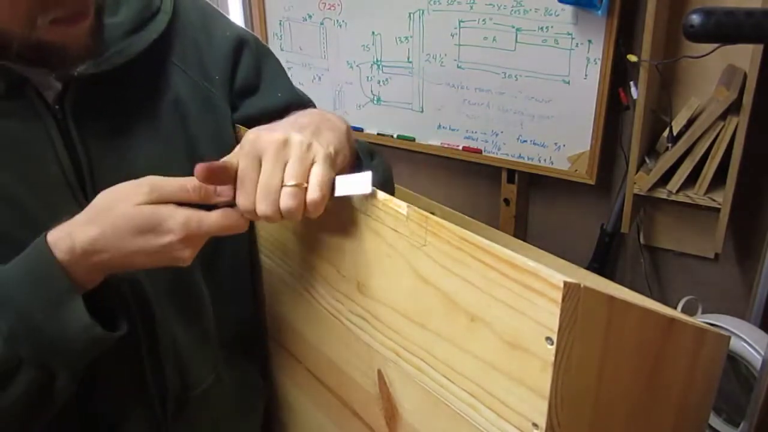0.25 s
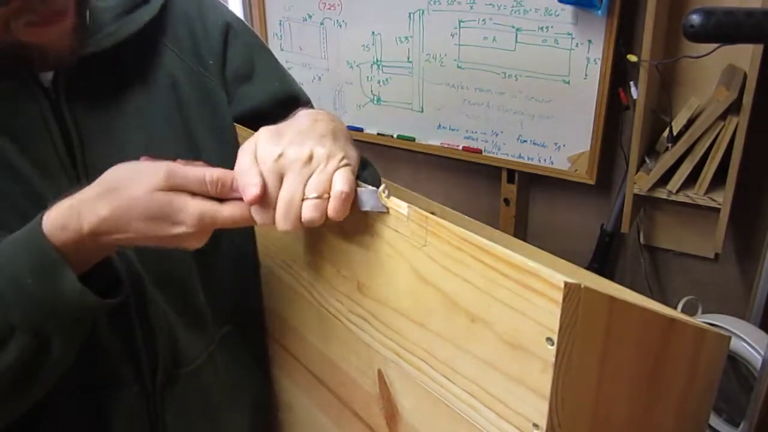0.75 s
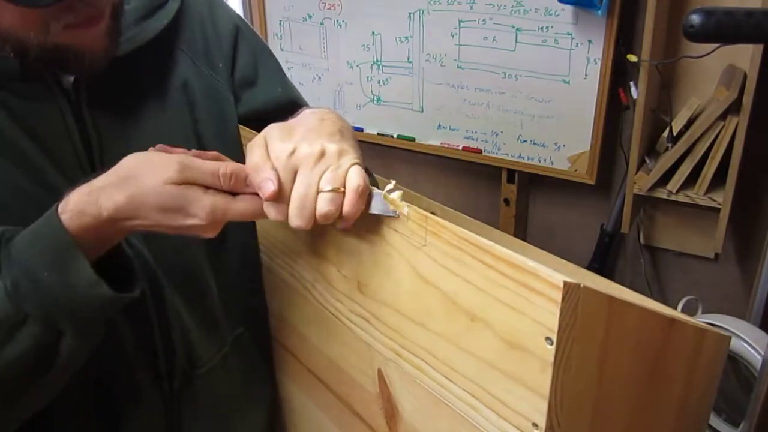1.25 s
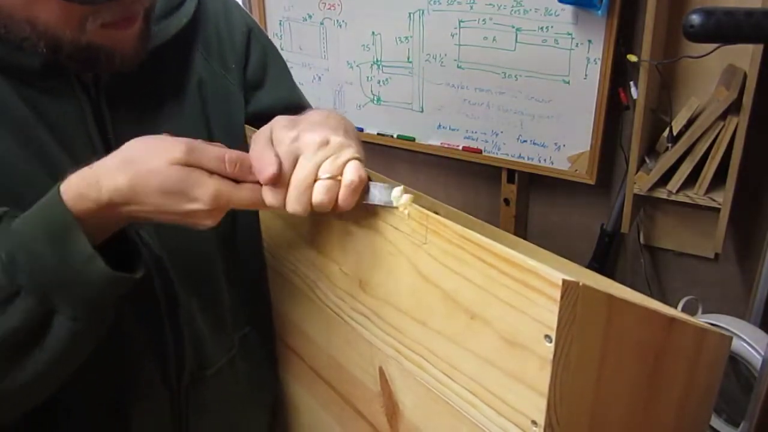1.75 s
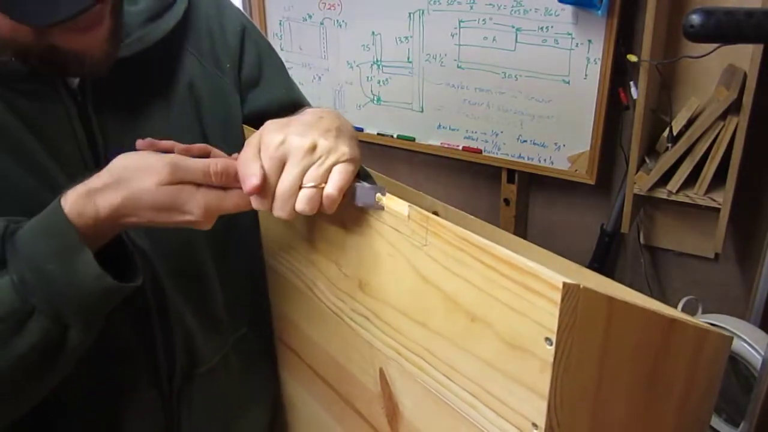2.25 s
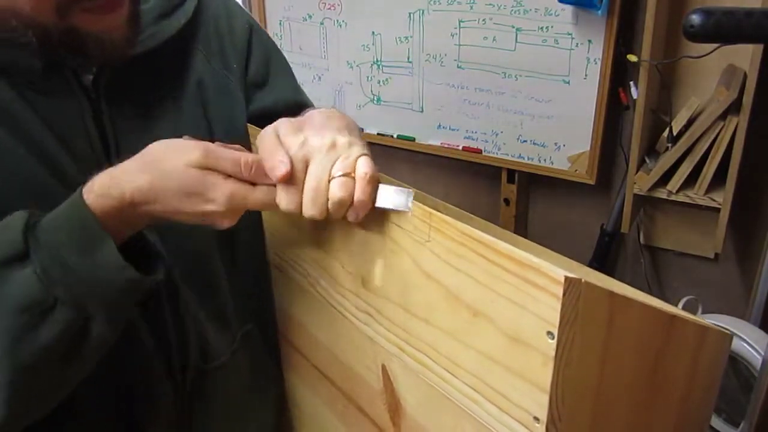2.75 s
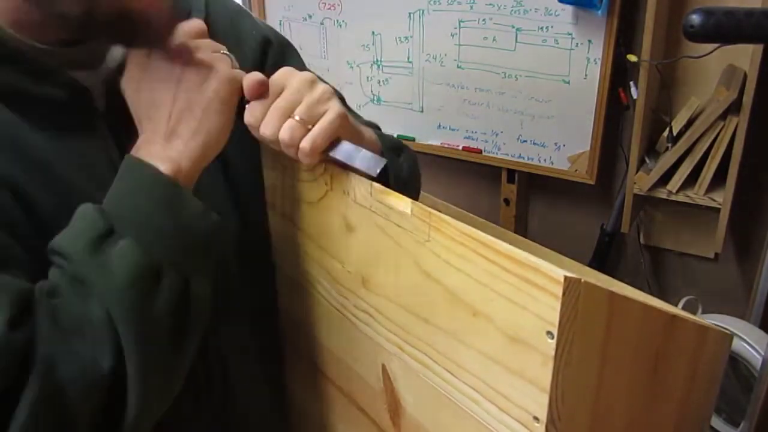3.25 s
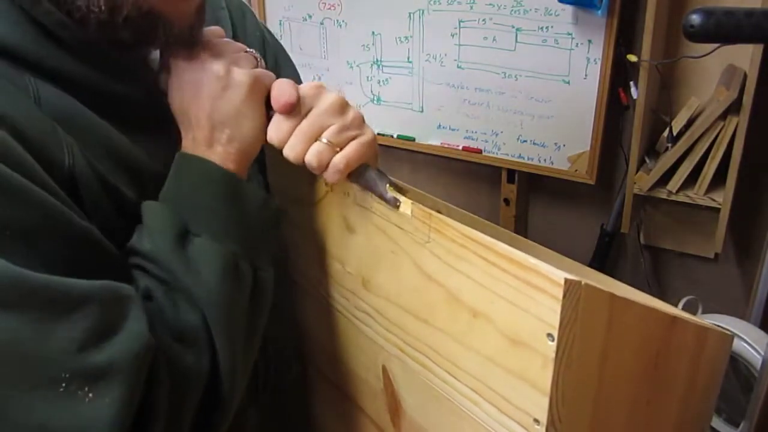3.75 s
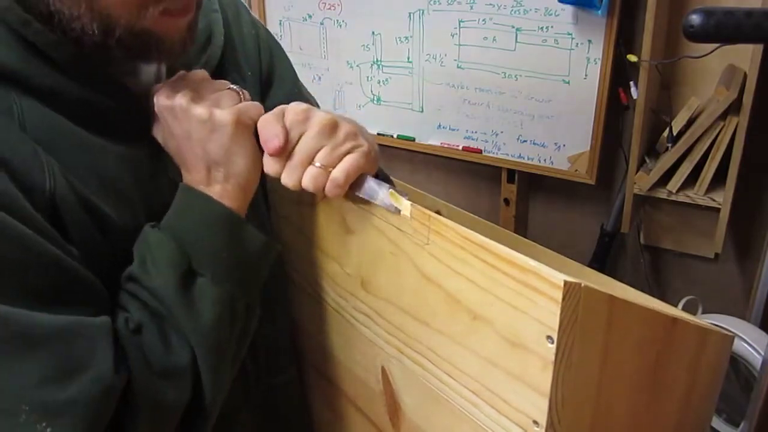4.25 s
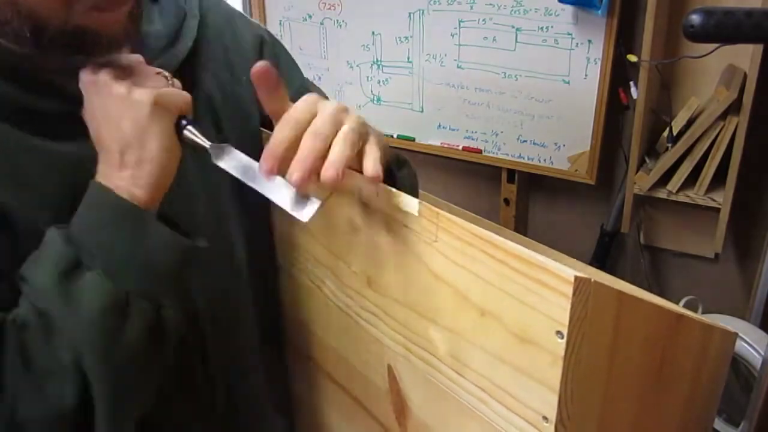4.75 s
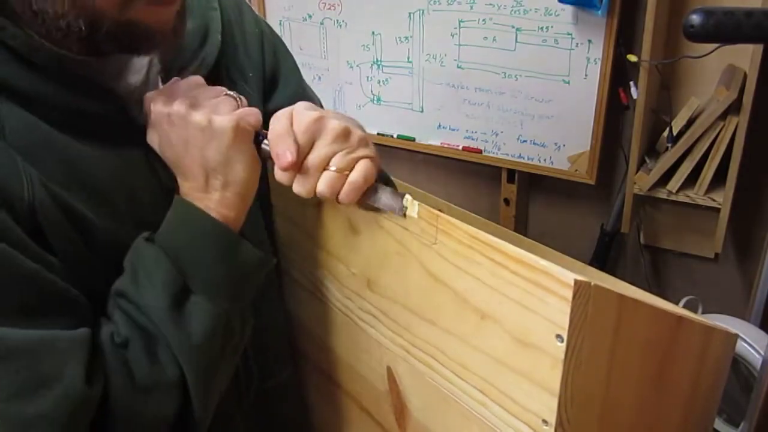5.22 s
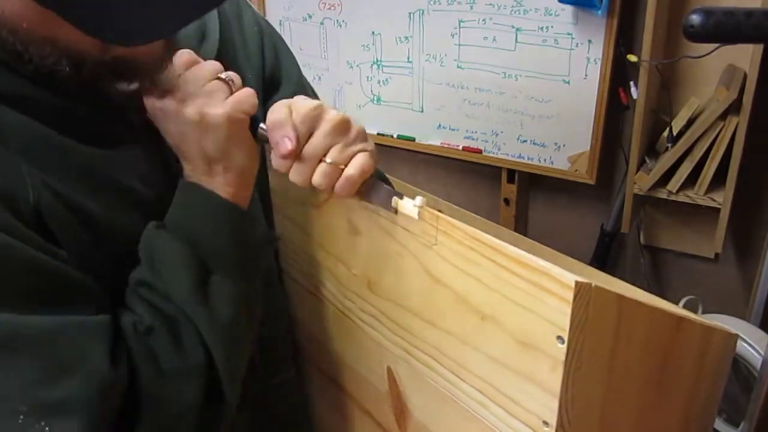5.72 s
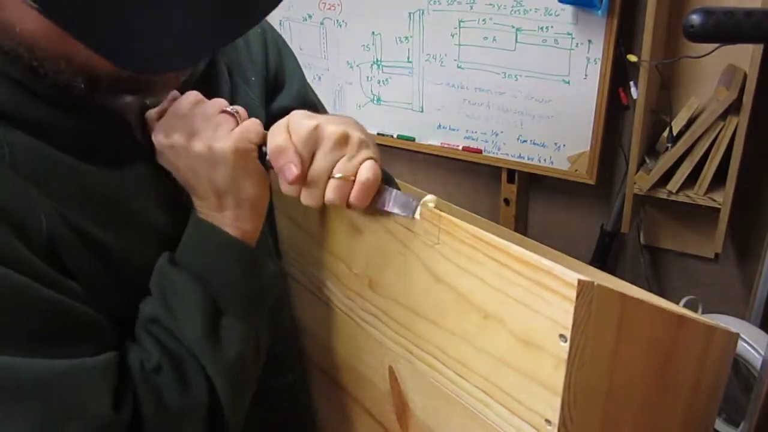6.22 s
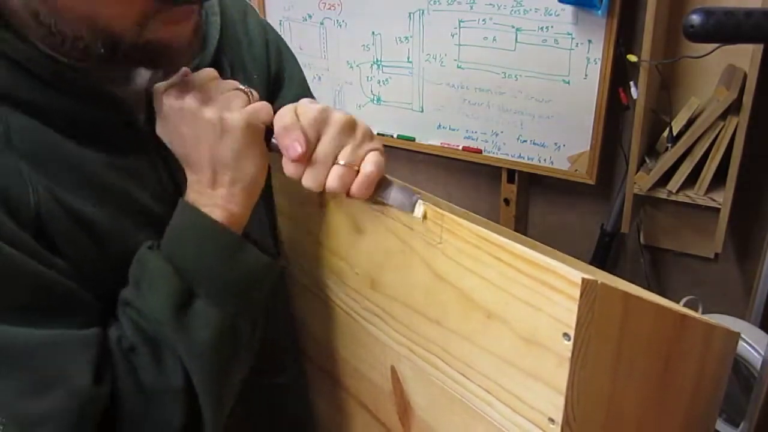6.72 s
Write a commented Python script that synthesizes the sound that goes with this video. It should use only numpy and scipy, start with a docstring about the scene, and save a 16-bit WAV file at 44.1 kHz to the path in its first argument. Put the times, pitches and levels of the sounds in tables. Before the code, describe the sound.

A close microphone in a small, dry workshop catches hand chiselling on a pine box. For the first 0.4 seconds there is only soft room air with a faint low hum. From 0.5 the blade bites: quick, irregular ticks and crackles, with sharper snaps near 0.57, 1.14, 1.6, 1.73, 2.17 and 2.3, short woody ringing and a faint scrape under each push. Cutting thins after 2.75. Around 2.9 to 3.1 fingers brush shavings away, a soft fading hiss and a shorter one. Small ticks resume near 3.45, then isolated hard clicks at 3.88, 4.33 and the loudest at 4.6. A quieter patch follows, with light crackles and moderate snaps around 5.1, 5.33, 5.7, 6.18 and 6.5, a strong click at 6.68 and a last small crunch near 6.94. A very faint distant motor whine wavers from about 4 seconds onward.

```python
"""A quiet workshop, close to a single microphone: a chisel pares the edge of a pine box.
Each push tears a few fibres: short noise bursts excite the damped modes of boards and blade.
Under each push the edge rubs softly, louder as the tears grow louder, as slip noise through the
same modes; fingers twice brush shavings away as shaped hiss. Behind lie room air, as coloured noise
with fuzzy drones, and a far motor's whine, as drifting sines. Sparse decaying taps echo the tears."""
import sys
import numpy as np
from scipy import signal
from scipy.fft import rfft, irfft
from scipy.io import wavfile
from scipy.ndimage import uniform_filter1d

SR = 44100
rng = np.random.default_rng(int(sys.argv[2]) if len(sys.argv) > 2 else 0)


def put_to_file(sound):
    """Save the sound as 16-bit audio at rate SR, in the file named by the first command-line argument."""
    columns = np.atleast_2d(sound).T  # one column per channel
    safe = np.clip(columns, -1, 1)
    whole_steps = np.round(safe * 32767)
    wavfile.write(sys.argv[1], SR, whole_steps.astype(np.int16))


N = 307818

# the four bands of a tear, in order thump, ring, crack, fizz: low f/Hz, high f/Hz
TEAR_BANDS = [(240, 1250), (1250, 2300), (2300, 6800), (6800, 19000)]


def gain_of(db):
    """Logarithmic level: decibels to an amplitude ratio."""
    return 10 ** (np.asarray(db) / 20)


def evened(x):
    """Power normalisation: scales a signal to rms 1."""
    return x / np.sqrt(np.mean(x ** 2) + 1e-20)


def read(points, hz):
    """Interpolation of a spectrum table on a logarithmic frequency axis."""
    f, value = np.transpose(points)
    return np.interp(np.log(hz + 1), np.log(f + 1), value)


def follow(rows, column):
    """Linear interpolation in time: one column of a curve at every sample."""
    rows = np.array(rows)
    return np.interp(np.arange(N) / SR, rows[:, 0], rows[:, column])


def patchy_noise(colour_db, patchy_db, size):
    """Filtered Gaussian noise: random short-time spectra of a given colour, in loud and soft patches."""
    frames = 4 * N // size + 5
    real, imaginary, patches = rng.standard_normal((frames, size // 2 + 1, 3)).T
    patches = uniform_filter1d(patches, size=10, axis=0)
    patches = evened(uniform_filter1d(patches, size=10, axis=1))
    level_db = colour_db[:, None] + patchy_db * patches
    spectra = (real + 1j * imaginary) * gain_of(level_db)
    noise = signal.istft(spectra, nperseg=size, noverlap=3 * size // 4)[1]
    return evened(noise[:N])


def air():
    """Broadband room noise: a continuous spectrum on which resonance-shaped peaks stand as drones."""
    # colour of the air: f/Hz, relative spectral level/dB
    air_colour = [(18, -60), (30, -18.5), (153, -6.5), (227, -5), (415, -1), (801, -4.5), (1460, -9.5),
                  (1960, -7), (2680, -12), (5000, -16), (8000, -18.5), (13700, -22.5), (15800, -26)]
    # drones in the air: f/Hz, width/Hz, level over the air/dB
    drones = [(400, 90, 3.5), (965, 25, 8), (2890, 30, 4)]
    # overall level of the air: t/s, level/dB
    air_level = [(0, -62.5), (.4, -62.5), (.7, -60.5), (1.3, -58.5), (3.5, -58), (4.8, -59.5), (6.98, -59)]
    hz = np.fft.rfftfreq(2048, 1 / SR)
    drones_db = sum(db / (1 + (2 * (hz - f) / width) ** 2) for f, width, db in drones)
    noise = patchy_noise(read(air_colour, hz) + drones_db, patchy_db=2.0, size=2048)
    return gain_of(follow(air_level, 1)) * noise


def motor():
    """Rotating source: tones at fixed multiples of one drifting pitch, each swelling and fading alone."""
    # pitch of the whine: t/s, f/Hz
    whine = [(0, 1287), (3.5, 1280), (3.9, 1240), (4.6, 1265), (5.45, 1305), (6.05, 1299), (6.98, 1262)]
    # swells: multiple of the pitch, t of the top/s, half length down to -10 dB/s, level at the top/dB
    swells = [(1, 4.18, .35, -71), (1, 5.55, .25, -73), (1, 6.35, .55, -68), (3, 5.45, .3, -75),
              (3, 6.05, .5, -71.5), (3, 6.75, .15, -75), (3.5, 6.05, .15, -75)]
    t = np.arange(N) / SR
    turns = np.cumsum(follow(whine, 1)) / SR
    out = np.zeros(N)
    for multiple, top_s, half_s, top_db in swells:
        flutter = evened(uniform_filter1d(rng.standard_normal(N), size=3000))
        level_db = top_db - 10 * ((t - top_s) / half_s) ** 2 + 3 * flutter
        out += gain_of(level_db) * np.sin(2 * np.pi * multiple * turns)
    return np.sqrt(2) * out  # levels are rms


def walls(x):
    """Reverberation: sparse reflections of random sign, each band decaying exponentially at its own rate."""
    # decay of the echo: f/Hz, time for a 60 dB fall t/s
    decay = [(250, 0.054), (700, 0.087), (1800, 0.032), (5000, 0.044), (12000, 0.018)]
    taps, at = np.zeros(8192), np.arange(100, 8000, 20)
    at = at + rng.integers(0, 20, len(at))
    taps[at] = rng.choice([-1., 1.], len(at))
    hz, t, spectra = signal.stft(taps, SR, nperseg=128)
    fall_db = -60 * t / read(decay, hz)[:, None]
    tail = signal.istft(spectra * gain_of(fall_db), SR, nperseg=128)[1]
    return signal.oaconvolve(x, tail / np.linalg.norm(tail))[:N]


def brush():
    """Friction noise of skin on planed wood: a soft hiss, its amplitude modulated by a slight grit."""
    # colour of the hiss: f/Hz, relative spectral level/dB
    hiss_colour = [(1200, -12), (2330, -8), (2440, 6), (2550, -8), (9000, -12), (12000, -6), (13200, -12),
                   (14400, -6), (15800, -10)]
    # fingers sweeping the shavings away: start t/s, length/s, starting level/dB
    strokes = [(2.878, .16, -54.5), (3.05, 0.074, -58)]
    edge_s, fade_db_per_s = 0.016, -44
    grit = gain_of(2.7 * evened(uniform_filter1d(rng.standard_normal(N), size=120)))
    hiss = patchy_noise(read(hiss_colour, np.fft.rfftfreq(1024, 1 / SR)), patchy_db=2, size=1024)
    t = np.arange(N) / SR
    envelope = np.zeros(N)
    for start, length, db in strokes:
        nearest_end_s = np.minimum(t - start, start + length - t)
        ramps = np.clip(nearest_end_s / edge_s, 0, 1)
        envelope += gain_of(db + fade_db_per_s * (t - start)) * ramps
    return envelope * evened(grit * hiss)


def response(low_hz, high_hz):
    """Modal impulse response: damped sines of box and blade plus a plain snap, cut to one band."""
    # modes of box and blade (the pair near 1700 Hz is coupled: it swells, then cancels):
    # f/Hz, width/Hz, level/dB
    modes = [(404, 40, -5.5), (477, 43, -12.5), (619, 40, -13.5), (699, 137, -16), (1071, 48, -8),
             (1645, 115, -1), (1765, 115, -2), (1910, 37, -11.5), (2350, 250, -22), (2540, 1050, -7.5),
             (3650, 460, -1), (3977, 610, 0), (4585, 1500, -9.5), (5240, 32, -13), (5480, 230, -7.5),
             (6769, 560, -5), (7350, 790, -13.5), (8553, 250, -13.5), (8600, 110, -16.5),
             (10680, 140, -29.5), (12400, 180, -40), (13330, 160, -44.5)]
    # snap between the modes: f/Hz, level/dB
    snap = [(550, -17.5), (1700, -15), (3950, -17.5), (11400, -22.5)]
    n = np.arange(2048)
    out = gain_of(read(snap, np.sqrt(low_hz * high_hz))) * (n == 0)
    for k, (hz, width, db) in enumerate(modes):
        if low_hz <= hz < high_hz:
            r = np.exp(-np.pi * width / SR)  # decay per sample
            gain = (-1) ** k * gain_of(db) * 2 * (1 - r)
            out += gain * r ** n * np.sin(2 * np.pi * hz * n / SR)
    band = signal.butter(2, [low_hz, high_hz], "bandpass", fs=SR, output="sos")
    return signal.sosfilt(band, out)


def rub(work):
    """Stick-slip friction: tiny slips excite the modes; they follow the push that also drives the tears."""
    level_db, swing_share = -76.5, 1  # level when tears average -45 dB; share of their swing in dB
    push_s = 0.24  # span of a push
    band_db = (0, -5.5, -7)  # ring, crack, fizz
    unevenness = evened(uniform_filter1d(rng.standard_normal(N), size=200))
    slips = rng.standard_normal(N) * gain_of(7 * unevenness)
    window = np.hanning(round(2 * push_s * SR))
    power = abs(signal.oaconvolve(work ** 2, window / window.sum(), "same"))
    push_db = 10 * np.log10(power + 1e-7) + 45
    sound = 0
    for band, db in zip(TEAR_BANDS[1:], band_db):
        sound = sound + gain_of(db) * evened(signal.oaconvolve(slips, response(*band))[:N])
    return gain_of(level_db + swing_share * push_db) * sound


def faint_tears():
    """Random point process: weak tears at uniform moments, levels scattered about one faint tear."""
    # spans while the blade works: from t/s, to t/s, number of tears
    spans = [(.35, 2.8, 8), (3.4, 6.95, 12)]
    # one faint tear: crack level/dB, then thump, ring and fizz re crack/dB, then swell time
    # (below the 1 ms floor in tears(), so the floor is used)
    typical = (-61.5, -3, 1, -6.5, -1)
    spread_db = 2.5
    s = np.concatenate([rng.uniform(start, end, count) for start, end, count in spans])
    scatter_db = spread_db * rng.standard_normal((len(s), 4))
    return np.c_[s, typical[:4] + scatter_db, np.full(len(s), typical[4])]


def tears():
    """Impulsive excitation: quick swells of uneven fibre snaps convolved with the modes of the work."""
    # fibres tearing: t of the peak/s, crack level as rms over 10 ms/dB, thump re crack/dB,
    # ring re crack/dB, fizz re crack/dB, swell time for 60 dB/s
    tear_rows = [(.468, -64.5, -15, 10.5, -19, 0.0074), (.524, -65, 4, 9, -8, .02),
                 (.5447, -50, -2, -2, -6, 0.03), (.5615, -51, 9, 0, -1, 0.0041),
                 (.5732, -33.5, -10, -6.5, -6, 0.015), (.6043, -49, 8, 8.5, -1.5, 0.026),
                 (.642, -63.5, -2, 3, -3, 0.0086), (.6788, -55.5, 3.5, 5, -0.5, 0.066),
                 (.6979, -49.5, 0.5, 1, -26, 0.014), (.8322, -46, -1, 9, 0, 0.027),
                 (.87, -45, -8.5, -2, -5, 0.0054), (.8953, -52.5, -4, 4, -3.5, 0.042),
                 (.9718, -44.5, 6, 8, -1, 0.012), (1.0442, -46.5, -8, 11.5, 3.5, 0.0037),
                 (1.105, -62, 0, 3, -6, .04), (1.1419, -33, -10.5, 7.5, -3.5, 0.014),
                 (1.1613, -48.5, 0, -8, -31, 0.0099), (1.187, -46.5, -4, -1, -1.5, 0.021),
                 (1.2277, -44.5, -23, -4, -6, 0.0047), (1.2414, -49, -4, 3, -5, 0.017),
                 (1.279, -49, -3, -5, -1.5, 0.018), (1.3177, -48.5, 7.5, 12.5, 3, 0.0094),
                 (1.3784, -57.5, -6, -3, 2.5, 0.018), (1.4423, -55.5, -9, -2, -1.5, .028),
                 (1.473, -38.5, -16.5, 8.5, 3.5, 0.0045), (1.4953, -60, -15, 14, -8, .03),
                 (1.5519, -43, 5, -2, -5, 0.0067), (1.5735, -39.5, 5, 7.5, -2.5, 0.017),
                 (1.5949, -26.5, -19, -1, -4.5, 0.02), (1.6213, -45, -10, -2, -3.5, 0.0027),
                 (1.7062, -51.5, -4, -4, -5, 0.012), (1.7286, -34.5, -4.5, 2.5, -5, 0.037),
                 (1.7795, -38, -14.5, -6, -2, 0.0027), (1.835, -49, -3, 8.5, -2, .031),
                 (1.8607, -45.5, -3, -4, -6, 0.036), (1.8972, -42, -0.5, 2, -1.5, 0.042),
                 (1.9393, -50, 7.5, 13, 0.5, 0.016), (2.0755, -52.5, -.5, 12, -7, 0.0055),
                 (2.1385, -53.5, 3.5, 5.5, -3, 0.015), (2.168, -30.5, -1, -1.5, -6.5, 0.007),
                 (2.3101, -28.5, -8.5, 1, -6, 0.015), (2.3582, -43, -14, -0.5, -3, 0.0055),
                 (2.3982, -45, 1.5, 5, -3, 0.041), (2.42, -36.5, 6.5, 10, -2.5, 0.025),
                 (2.5098, -40, -11, -2.5, -2.5, 0.003), (2.5562, -62, 11.5, 10, -15, 0.018),
                 (2.6758, -66, 10, 13, 0, 0.029), (2.7194, -35.5, 3, 2.5, -1.5, 0.0072),
                 (2.738, -52, 6.5, 4, -2, 0.0084), (2.7971, -61, -9, -8, 1, .008),
                 (3.0157, -59.5, -22, 4, 7, .011), (3.1166, -59.5, 10, 1, 1.5, 0.0082),
                 (3.3223, -57.5, 0, 4.5, -22, 0.011), (3.4466, -54, -8, 2, -5, 0.048),
                 (3.5557, -58, -20, -18, -6, .011), (3.577, -49.5, -1, 5, 0.5, 0.015),
                 (3.639, -42.5, -1, 14.5, 0, 0.005), (3.6541, -46, 1, 1, -24, 0.028),
                 (3.6653, -51, 3, 1, -29, 0.0075), (3.6783, -45, -11, -3, -2.5, 0.0082),
                 (3.7092, -57, 3.5, 7, 2, 0.021), (3.771, -59.5, -13, 3, -3, .027),
                 (3.8237, -61.5, -13, 5, -4, .012), (3.879, -26.5, -16, -.5, -11, .005),
                 (4.052, -51.5, -4.5, -1, -5, 0.025), (4.0653, -56, -13, 5, 0, .014),
                 (4.076, -55, 3, -1, -4, .023), (4.096, -39, -5.5, -2, -7.5, 0.016),
                 (4.1399, -46, -9, 2.5, -3, .012), (4.2957, -56.5, -7, 0, 0, 0.0044),
                 (4.326, -33.5, -5, 9, -7.5, 0.0069), (4.374, -51.5, 4, 2, -10, .009),
                 (4.5498, -51, -1.5, 4, -6, 0.036), (4.569, -46.5, 5, 7.5, 1, 0.032),
                 (4.592, -24.5, -14.5, -5.5, -13, 0.014), (4.6713, -62, -5, -3, -2, .013),
                 (4.8867, -50.5, -11, 14, -2, 0.0055), (4.9958, -53, -5, 0, 1.5, 0.0062),
                 (5.0305, -61, -19, 2, -6, .021), (5.063, -59, -21, -11, -5, .013),
                 (5.0934, -41, -6, 6.5, 0, 0.021), (5.1498, -60.5, -5, 2.5, -2, .036),
                 (5.1909, -60, -16, -8, -7, .019), (5.226, -62, -10, 4, -5, 0.028),
                 (5.2404, -53, 3, -1.5, -0.5, 0.13), (5.292, -60.5, -15, 1, -3, .033),
                 (5.3303, -38.5, -3.5, 10.5, -3.5, .01), (5.4738, -53.5, -11, 8.5, 0.5, .011),
                 (5.501, -60, -17, 2, -21, .013), (5.5555, -52, -2.5, 5.5, -9, .007),
                 (5.6357, -47, -9, 1.5, -2, 0.0032), (5.7148, -38, 1, 0, 1, 0.007),
                 (5.7482, -44, -3, 5, 0.5, 0.0081), (5.7988, -42, -1, 2.5, -3.5, 0.015),
                 (5.817, -58.5, -17, -9, 9, .005), (5.8952, -60.5, 6.5, 3, -22, 0.028),
                 (5.9319, -61.5, 5, 8, -1, 0.017), (5.9682, -63, 4, 9.5, -14, 0.022),
                 (6.1164, -44, 0.5, 1.5, -2, 0.0061), (6.1775, -34, -2, 8.5, -2.5, 0.011),
                 (6.3146, -52.5, -0.5, 3.5, -1, 0.038), (6.4074, -55, 2, 5.5, -0.5, 0.017),
                 (6.4826, -47.5, -3.5, 2.5, -12, 0.0055), (6.5176, -42.5, -10, -2, 0.5, 0.0043),
                 (6.53, -39.5, 6.5, 13.5, -2.5, 0.0078), (6.5913, -59.5, -16, 2, 2, 0.02),
                 (6.6561, -56, -4, -2, -2, 0.03), (6.683, -29, -8, 4, -15.5, 0.0058),
                 (6.9354, -49, -9, 2.5, 0.5, 0.12), (6.945, -46.5, 3.5, 13.5, -7, 0.0064)]
    size, lead = 4096, 1024  # samples: span of a tear, part ahead of its peak
    fade_s = 0.017  # die-away time for 60 dB
    thump_spread = .18  # random scatter of the thump centre from tear to tear, as a share
    rows = np.r_[tear_rows, faint_tears()]
    s, db, thump_db, ring_db, fizz_db, swell_s = rows.T[:, :, None]
    thump_hz = 724 * np.exp(thump_spread * rng.standard_normal((len(s), 1)))
    crack_hz = 4170 + 47 * fizz_db - 50 * ring_db  # fizzy tears crack high, ringing ones low

    t = (np.arange(size // 2) - lead) / SR
    hz = np.fft.rfftfreq(size, 1 / SR) + 1
    snaps, unevenness = np.moveaxis(rng.standard_normal((len(s), 2, len(t))), 1, 0)
    level_db = 60 * np.where(t < 0, t / np.maximum(swell_s, .001), -t / fade_s)
    # nothing gives until the load is near its peak
    started = level_db > np.where(t < 0, -21., -np.inf)
    force = rfft(started * snaps * gain_of(level_db + 1.07 * unevenness), size)

    # one broad resonance colours each thump, at a scattered centre, and another each crack
    thump_colour = 1 / (1 + 1.2j * (hz / thump_hz - thump_hz / hz))
    crack_colour = 1 / (1 + 1.2j * (hz / crack_hz - crack_hz / hz))
    bands_db = (thump_db, ring_db, 0, fizz_db)
    colours = (thump_colour, 1, crack_colour, 1)
    sound = 0
    for band, band_db, colour in zip(TEAR_BANDS, bands_db, colours):
        wave = irfft(force * colour * rfft(response(*band), size), size)
        rms_10ms = np.sqrt((wave ** 2).sum(1, keepdims=True) / (SR // 100))
        sound = sound + gain_of(db + band_db) * wave / rms_10ms

    out = np.zeros(N + size)
    starts = np.round(s[:, 0] * SR).astype(int) - lead
    for start, wave in zip(starts, sound):
        out[start:start + size] += wave
    return out[:N]


def scene():
    """Superposition: the room, the motor, the brushing, and the work with its echo."""
    work = tears()
    echo = gain_of(-17) * walls(work)
    return (air() + motor() + brush() + rub(work) + echo + work)[None]


def record(dry):
    """Band limitation: the recorder as a linear-phase low-pass filter."""
    edge_hz = 15900
    lowpass = signal.firwin(255, edge_hz, window=("kaiser", 9), fs=SR)
    return signal.oaconvolve(dry, lowpass[None], "same")


dry = scene()
out = record(dry)
put_to_file(out)
```